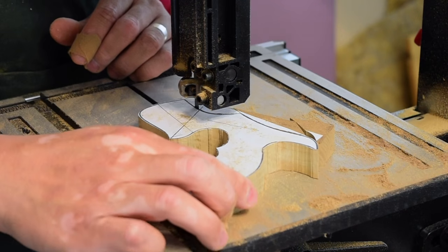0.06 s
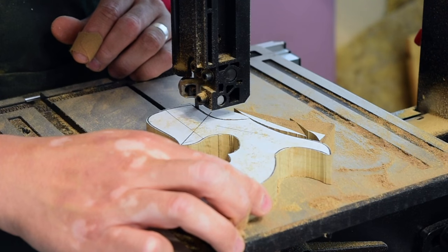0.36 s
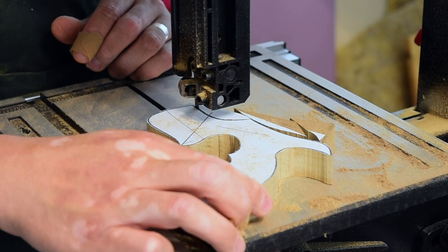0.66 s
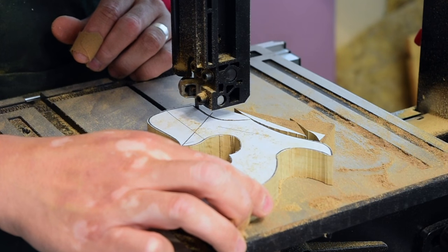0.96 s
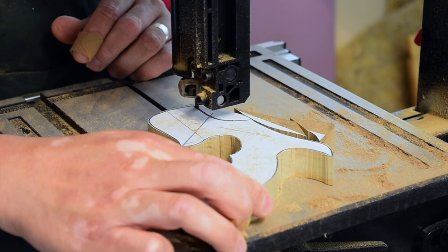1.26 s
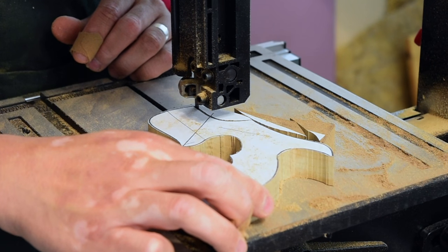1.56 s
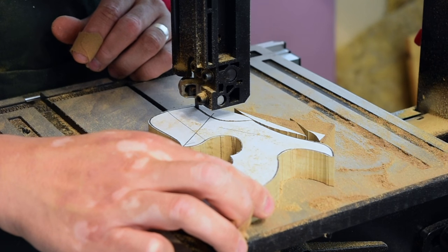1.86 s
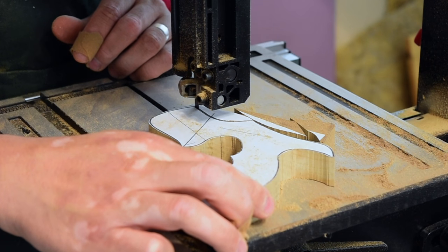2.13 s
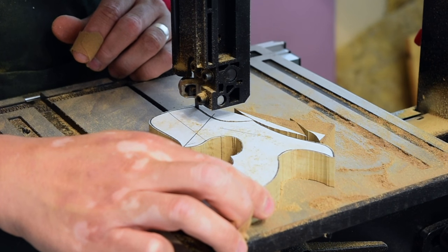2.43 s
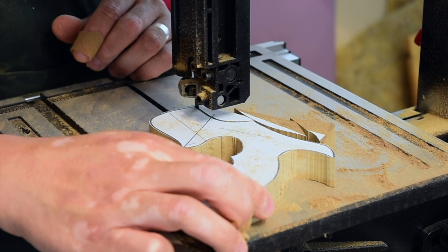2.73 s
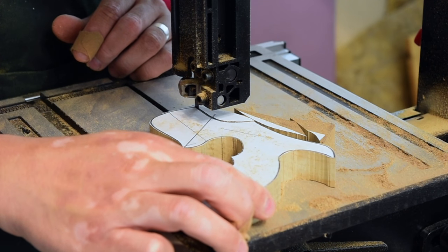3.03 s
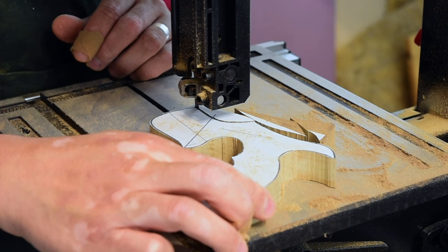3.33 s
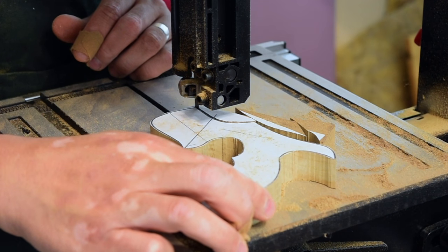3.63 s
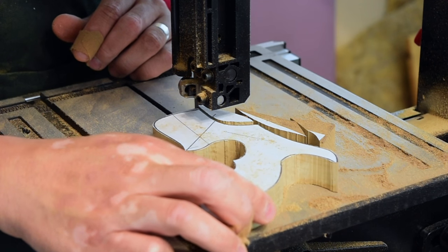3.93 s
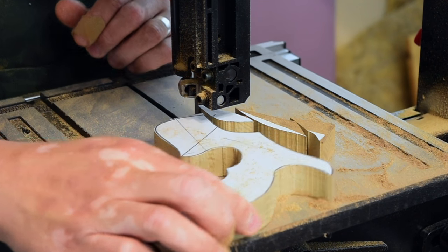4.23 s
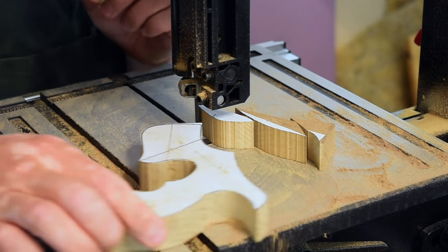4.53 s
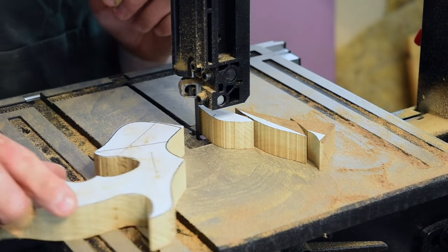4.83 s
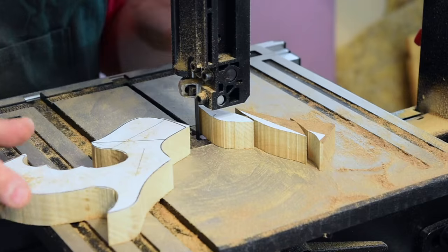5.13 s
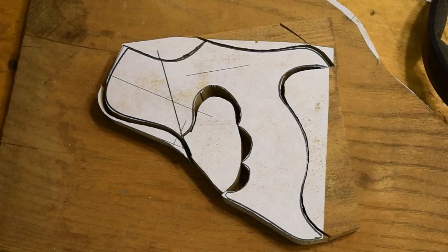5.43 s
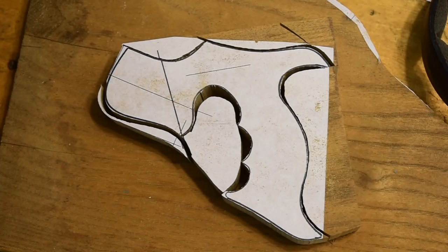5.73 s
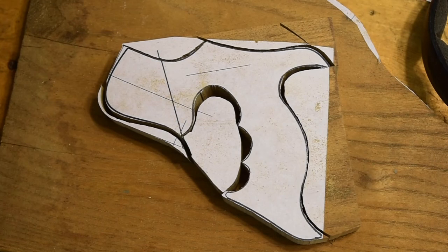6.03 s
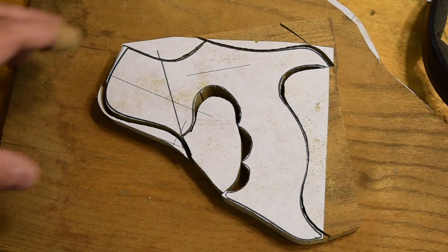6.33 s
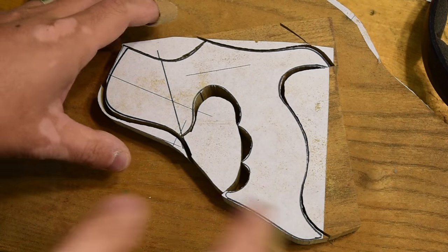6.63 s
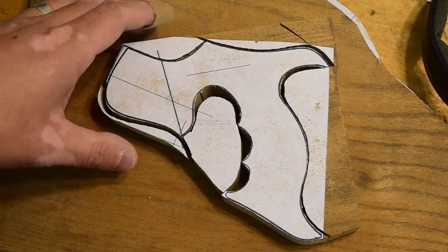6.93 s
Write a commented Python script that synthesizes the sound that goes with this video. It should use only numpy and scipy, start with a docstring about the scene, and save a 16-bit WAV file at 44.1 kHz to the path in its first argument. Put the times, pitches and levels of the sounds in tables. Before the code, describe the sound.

In a small workshop, a moment of thin hiss gives way to a band saw close to the microphone, cutting thick wood. The teeth rasp and sing, with high squeals from the blade. The blade comes free and the machine rattles and hums on. It cuts off abruptly, and a few soft bumps on a bench and a sleeve rustle follow in the quiet room.

```python
"""A small workshop, close to a benchtop band saw cutting a curve through a thick wooden block. After a moment
of thin hiss and whine the saw is there at full voice: teeth rasp and sing, the blade squeals in the kerf and
the loosening offcut rings lower and lower. The blade leaves the wood and the frame, shaken by wheels and motor,
rattles on. The scene changes abruptly to the quiet room, where soft bumps ring the bench and a sleeve rustles
over it."""
import sys
import numpy as np
from scipy import signal
from scipy.fft import rfft, irfft, next_fast_len
from scipy.io import wavfile

SR = 44100
rng = np.random.default_rng(int(sys.argv[2]) if len(sys.argv) > 2 else 0)


def put_to_file(sound):
    """Save the sound as 16-bit audio at rate SR, in the file named by the first command-line argument."""
    columns = np.atleast_2d(sound).T  # one column per channel
    safe = np.clip(columns, -1, 1)
    whole_steps = np.round(safe * 32767)
    wavfile.write(sys.argv[1], SR, whole_steps.astype(np.int16))


N = 312095
SAW_ON_S, BREAKOUT_S, SAW_OFF_S = 0.3705, 3.885, 5.455   # at breakout the blade leaves the wood
WHEEL_HZ, BLADE_LAP_HZ, TOOTH_HZ = 17.05, 8.13, 1625   # turns, laps and teeth per second


def from_db(db):
    """Decibels to gain."""
    return 10 ** (np.asarray(db) / 20)


def unit_rms(x):
    """Scale to unit power."""
    return x / np.sqrt(np.mean(x ** 2) + 1e-20)


def seconds():
    """Time of every sample."""
    return np.arange(N) / SR


def automation(points):
    """Straight ramps between (time, value) points."""
    return np.interp(seconds(), *np.transpose(points))


def after(middle_s, fade_s):
    """A smooth step from 0 to 1."""
    return .5 + .5 * np.tanh((seconds() - middle_s) / fade_s)


def fading(start_s, t60_s):
    """An envelope that starts at once and dies away."""
    age = seconds() - start_s
    return (age > 0) * from_db(-60 * np.clip(age / t60_s, 0, 4))


def stroke(peak_s, rise_s, t60_s):
    """An envelope that swells to its peak and dies away."""
    age = seconds() - peak_s
    attack = np.exp(-(np.minimum(age, 0) / rise_s) ** 2)
    return attack * from_db(-60 * np.clip(age / t60_s, 0, 4))


def white():
    """Fresh white noise."""
    return rng.standard_normal(N)


def drift(rate_hz):
    """Smooth random wandering of unit power."""
    knots = rng.standard_normal(N // 8)
    return unit_rms(np.interp(seconds() * 2 * rate_hz, np.arange(len(knots)), knots))


def tone(hz):
    """A sine of unit power that follows a pitch."""
    cycles = np.cumsum(hz * np.ones(N)) / SR
    return np.sqrt(2) * np.sin(2 * np.pi * (cycles + rng.random()))


def colour(x, eq):
    """Filter by an EQ curve of (freq_hz, gain_db) that rolls off below its first point."""
    hz, db = np.transpose(eq)
    size = next_fast_len(N + SR // 4)
    f = np.maximum(np.arange(size // 2 + 1) * SR / size, 1)
    gain = from_db(np.interp(np.log(f), np.log(hz), db)) * np.minimum(f / hz[0], 1) ** 2
    return irfft(rfft(x, size) * gain, size)[:N]


def resonate(x, hz, width_hz):
    """Two-pole resonance with gain 1 at its peak."""
    r = np.exp(-np.pi * width_hz / SR)
    feedback = [1, -2 * r * np.cos(2 * np.pi * hz / SR), r * r]
    return signal.lfilter(np.array([1, 0, -1]) * (1 - r * r) / 2, feedback, x)


def body(x, modes):
    """The direct sound plus the ringing of each resonance."""
    return x + sum(from_db(db) * resonate(x, hz, width) for hz, width, db in modes)


def ringing(x, t60_s):
    """Dense ringing: the sound dies away in a random tail."""
    age = seconds()[:SR // 3]
    tail = rng.standard_normal(len(age)) * from_db(-60 * age / t60_s)
    return signal.fftconvolve(x, tail / np.linalg.norm(tail))[:N]


# Dark room tone: freq_hz, gain_db
ROOM_EQ = [(25, -2), (70, -2), (115, 1), (170, 1), (250, 3.5), (330, -5), (450, 0), (515, 4), (620, -7),
           (1400, -9), (2300, -17), (3400, -7), (6500, -17), (11000, -17.5), (15500, -27)]

def room_tone(air_db=-58, hum_hz=113.3, hum_db=-61):
    """A bed of quiet air with a low, wavering hum."""
    air = from_db(air_db) * unit_rms(colour(white(), ROOM_EQ))
    return air + from_db(hum_db + 1.3 * drift(3.7)) * tone(hum_hz)


# Dull rub of cloth: freq_hz, gain_db
RUB_EQ = [(250, -4), (600, -1.5), (1200, 2), (2500, 0.5), (4000, -8.5), (7000, -24)]
# Airy swish on top: freq_hz, gain_db
SWISH_EQ = [(3000, -9), (5500, 3), (9500, 3), (12500, -10), (15500, -18)]
# Sleeve strokes over the bench: peak_s, rise_s, t60_s, rub_db, swish_db
STROKES = [(5.994, 0.024, .6, -53.5, -53.5), (6.13, .05, 1, -65, -57.5), (6.29, .12, 1.5, -61, -72),
           (6.45, 0.03, 1.1, -53, -67), (6.52, .05, 1.1, -61, -63.5), (7.07, .025, .5, -59, -64)]
# Ticks of cloth catching on wood: start_s, level_db, pitch_hz
TICKS = [(5.977, -44, 2500), (5.986, -40, 8000)]

def sleeve(rub_trim_db=4.0, swish_trim_db=-0.5, weave_db=1.0, tick_t60_s=0.021):
    """Cloth slides in uneven grains, stroke by stroke, and catches twice."""
    rub_power, swish_power = from_db([-67.5, -72.5]) ** 2   # it never lies quite still
    for peak_s, rise_s, t60_s, rub_db, swish_db in STROKES:
        motion = stroke(peak_s, rise_s, t60_s)
        rub_power = rub_power + (from_db(rub_db) * motion) ** 2
        swish_power = swish_power + (from_db(swish_db) * motion) ** 2
    friction = white() * from_db(weave_db * drift(200))
    rub = from_db(rub_trim_db) * np.sqrt(rub_power) * unit_rms(colour(friction, RUB_EQ))
    swish = from_db(swish_trim_db) * np.sqrt(swish_power) * unit_rms(colour(friction, SWISH_EQ))
    ticks = sum(from_db(db) * fading(start_s, tick_t60_s) * unit_rms(resonate(white(), hz, hz / 2))
                for start_s, db, hz in TICKS)
    return rub + swish + ticks


# The bench's deep sway and hollow knock: pitch_hz, t60_s
BENCH_MODES = [(36, 0.37), (138, .15)]
# Soft bumps on the bench: start_s, sway_db, knock_db
BUMPS = [(5.787, -40, -45), (5.838, -43, -48), (5.89, -58, -49), (5.94, -45, -60), (6.03, -58, -46),
         (6.098, -52, -39), (6.15, -54, -40), (6.201, -60, -48), (6.48, -43, -60), (6.576, -43, -60),
         (6.66, -50, -65), (7.055, -52, -62)]

def bumps(thud_db=-11):
    """Each bump sets both modes of the bench swinging, with a dull thud."""
    thud_eq = [(30, -9), (160, -3), (300, -16), (900, -20), (3000, -52)]
    thud = from_db(thud_db) * unit_rms(colour(white(), thud_eq))
    bench = np.zeros(N)
    for start_s, *levels_db in BUMPS:
        for (hz, t60_s), db in zip(BENCH_MODES, levels_db):
            swing = np.sin(2 * np.pi * hz * (seconds() - start_s))
            bench += from_db(db) * fading(start_s, t60_s) * (swing + thud)
    return bench


# Broad, thin hiss: freq_hz, gain_db
HISS_EQ = [(15, -25), (25, -7), (97, -3.5), (199, -7), (409, -2), (480, -5), (549, -3.5), (1100, -7.5),
           (1720, -7), (4380, -11.5), (5560, -15), (6190, -12.5), (14500, -9)]
# Narrow bands of whine: pitch_hz, width_hz, level_db
WHINE = [(5780, 26, -43), (5600, 170, -46.5), (7270, 6.1, -47), (15330, 170, -34), (15520, 200, -45)]

def opening_hiss(hiss_db=-31, flicker_db=0.5):
    """A faintly flickering hiss with a high whine in it."""
    whine = sum(from_db(db) * unit_rms(resonate(resonate(white(), hz, width), hz, 2 * width))
                for hz, width, db in WHINE)
    return from_db(hiss_db + flicker_db * drift(28)) * unit_rms(colour(white(), HISS_EQ)) + whine


def roughness(turn_hz, speed):
    """The roughness of a turning part comes round again on every turn."""
    surface = rng.standard_normal(SR)
    turns = np.cumsum(turn_hz * speed) / SR
    return surface[(turns % 1 * SR / turn_hz).astype(int)]


# Rattle of wheels, guides and covers: freq_hz, gain_db
RATTLE_EQ = [(25, -46), (70, -43), (150, -32), (200, -26.5), (260, -16.5), (330, -4.5), (440, -13.5),
             (560, -12.5), (800, -7), (1000, -14), (1300, -16), (2000, -15.5), (3000, -13.5), (6500, -17),
             (9200, -16), (12000, -23), (15500, -32)]
# Resonances of the frame: pitch_hz, width_hz, gain_db
FRAME_MODES = [(270.4, 11, 7.5), (543, 12, -7), (830, 50, -4), (1233, 110, 6.5), (1387, 25.7, 13),
               (1687, 46, 6.5), (2395, 90, 4), (4870, 69, 0.5), (5900, 130, 2.5), (7860, 85, -3),
               (8350, 60, 4.5), (9360, 97, 0), (10500, 61, -3), (11750, 70, -3.5), (12800, 120, -3)]
# Steady tones of motor, belt and wheels: pitch_hz, relative_db
MOTOR_TONES = [(51.2, -61), (68.2, -64.5), (119.4, -62.5), (153.5, -58), (187.8, -50.5), (222, -51.5),
               (239, -39.5), (274, -36.5), (278, -34), (286, -31.5), (290.3, -27), (360.5, -30.5),
               (532, -37), (597.5, -44), (630, -35.5), (894.5, -31), (925.9, -53.5), (985.1, -48.5),
               (1405, -35.5), (1715, -38), (2385, -41)]

def frame(speed, rattle_gain_db=5.5, motor_gain_db=23, chatter_db=1.0, waver=0.00139):
    """Wheels and blade rattle the frame over the motor's tones; both swell after breakout."""
    cutting_db, idling_db = -32.5, -23.5
    fader_db = cutting_db + (idling_db - cutting_db) * after(BREAKOUT_S + 0.11, fade_s=.19)
    shaking = roughness(WHEEL_HZ, speed) + roughness(BLADE_LAP_HZ, speed) + 0.5 * white()
    shaking *= from_db(chatter_db * drift(220))
    rattle = unit_rms(body(colour(shaking, RATTLE_EQ), FRAME_MODES))
    motor = sum(from_db(db) * tone(hz * (speed + waver * drift(8))) for hz, db in MOTOR_TONES)
    return from_db(fader_db) * (from_db(rattle_gain_db) * rattle + from_db(motor_gain_db) * motor)


# Fader ride of the saw table's drone: time_s, fader_db
DRONE_RIDE = [(0.39, -29.5), (0.72, -24.5), (1.55, -37), (2.35, -35.5), (2.85, -21.5), (3.5, -26.5),
              (3.8, -31.5), (4.2, -29.5), (4.45, -26), (5.44, -26.5)]

def table_drone(speed, pitch_hz=746, trim_db=-3.5, throb_depth=0.6, waver=0.00139):
    """The saw table drones on one note and throbs at the rate the wheels turn."""
    throb = 1 + throb_depth * tone(WHEEL_HZ * (speed + .04 * drift(6)))
    drone = throb * tone(pitch_hz * (speed + waver * drift(22)))
    return from_db(automation(DRONE_RIDE) + trim_db) * drone


# Squeals and scrapes in the kerf: peak_s, length_s, pitch_hz, width_hz, level_db
SQUEALS = [(0.701, .25, 5740, 48.3, -21), (1.515, 0.94, 5710, 50, -24.5), (2.55, 0.075, 4950, 1500, -20),
           (3.03, 0.12, 3275, 30, -20.5), (3.422, 0.06, 4840, 2500, -21), (3.564, 0.13, 4040, 30, -24.5),
           (3.699, .1, 4600, 150, -37), (3.77, 0.11, 3800, 119, -23.5), (3.848, .07, 3200, 197, -22),
           (3.889, .06, 13300, 160, -37), (3.9, 0.083, 8000, 5000, -24), (4.02, 0.066, 6340, 140, -29),
           (4.125, 0.078, 6300, 110, -23), (4.125, 0.07, 9500, 3000, -22.5), (4.343, .04, 5800, 400, -27)]

def squeals():
    """The blade's flank rubs the wall of the kerf: swells of friction in one resonance each."""
    friction = np.zeros(N)
    for peak_s, length_s, hz, width_hz, db in SQUEALS:
        swell = np.exp(-2 * ((seconds() - peak_s) / length_s) ** 2)
        friction += from_db(db) * swell * unit_rms(resonate(white(), hz, width_hz))
    return friction


def offcut(start_s=2.7, end_s=3.7, held_hz=3310, loose_hz=1860, end_db=-22.5, swell_db_per_s=9.5):
    """Shaken by the teeth, the offcut rings lower and louder as the bridge of wood holding it thins."""
    glide_hz = held_hz + (loose_hz - held_hz) * after(3.46, fade_s=.3)
    glide_hz *= 1 + .022 * drift(40)   # the teeth detune it at random
    level_db = end_db - swell_db_per_s * np.maximum(end_s - seconds(), 0)
    gate = after(start_s, fade_s=0.056) * (1 - after(end_s, fade_s=0.056))
    # two modes, each fluttering in level and phase
    lower, upper = [(drift(110) * tone(hz) + drift(110) * tone(hz)) / np.sqrt(2)
                    for hz in (glide_hz, 1.8 * glide_hz)]
    return gate * from_db(level_db) * (lower + from_db(-7) * upper)


# Partials of the tooth note: harmonic, relative_db
TOOTH_PARTIALS = [(1, -1.5), (2, -15), (3, -4.5)]
# Fader ride of the tooth note: time_s, fader_db
NOTE_RIDE = [(0.39, -25.5), (0.97, -21), (1.15, -25), (2.15, -27.5), (2.45, -23), (2.72, -32), (3.3, -26.5),
             (3.85, -27.5)]

def tooth_note(tooth_hz, trim_db=-0.5, lap_swell_db=3.0, rough_db=2.5, fall_db_per_s=150.5):
    """Teeth pluck the blade into a note that swells once per lap of the band and dies at breakout."""
    fader_db = automation(NOTE_RIDE) - fall_db_per_s * np.maximum(seconds() - BREAKOUT_S, 0)
    lap = np.cos(2 * np.pi * BLADE_LAP_HZ * (seconds() - .083))
    note = sum(from_db(db + rough_db * drift(45)) * tone(k * tooth_hz) for k, db in TOOTH_PARTIALS)
    return from_db(fader_db + trim_db + lap_swell_db * lap) * note


# Bright rasp of tearing fibres: freq_hz, gain_db
RASP_EQ = [(250, -22.5), (450, -11), (620, -6), (820, -4.5), (960, -11.5), (1400, -4.5), (2050, -7.5),
           (2700, -6), (3400, -3), (4400, -0.5), (5300, -2), (6000, -2.5), (6900, -8), (9300, -8),
           (12000, -16.5), (15500, -23)]
# Resonances of the blade between its guides: pitch_hz, width_hz, gain_db
BLADE_MODES = [(1677, 65, 3.5), (1732, 30, 7.5), (2383, 190, 4), (2830, 32, -2.5), (3240, 88, 5),
               (3280, 8, 5), (3700, 29, -2.5), (4060, 21, -2.5), (4760, 25, -1), (4836, 126, 6),
               (4800, 30, 4), (4980, 25, 0.5), (5710, 210, -4), (6280, 11, 2.5), (6630, 22, -10.5),
               (7340, 130, -1), (8040, 34, -2), (9260, 52, 6), (9930, 27, 3), (11760, 42, -5.5)]

def rasp(tooth_hz, level_db=-14.5, bite=0.35, ease_s=3.5, ease_db_per_s=2.5, fall_db_per_s=78):
    """Each tooth tears fibres and rings the steel; the hand eases off, then the blade breaks out."""
    ease_db = ease_db_per_s * np.maximum(seconds() - ease_s, 0)
    fall_db = fall_db_per_s * np.maximum(seconds() - BREAKOUT_S, 0)
    tearing = white() * (1 + bite * tone(tooth_hz))
    tearing += .6 * ringing(tearing, t60_s=0.19)
    grain_db = 0.37 * drift(250)   # hard and soft grain
    feed_db = 0.84 * drift(18)   # the uneven push of the hand
    tearing *= from_db(grain_db + feed_db)
    blade = unit_rms(body(colour(tearing, RASP_EQ), BLADE_MODES))
    return from_db(level_db - ease_db - fall_db) * blade


def spread(x, width_eq):
    """The direct sound is centred; reflections in the workshop give it width."""
    side = colour(ringing(x, t60_s=.5), width_eq)
    return np.array([x + side, x - side])


# Stereo width of hiss, saw and bench: freq_hz, side_minus_mid_db
HISS_WIDTH = [(30, -12), (700, -14.5), (1500, -27.5), (3000, -52), (15000, -53)]
SAW_WIDTH = [(40, -37.5), (250, -45), (500, -23.5), (850, -33), (1200, -65.5), (2400, -67.5), (3500, -36.5),
             (5500, -23.5), (7500, -35), (9700, -9.5), (12000, -4), (15500, -15)]
BENCH_WIDTH = [(40, -22), (110, -25), (380, -12), (1300, -10), (2400, -13), (4400, -4), (8000, -5),
               (15000, -2)]

def scene():
    """Hiss, then the saw, which cuts off with a faint, short tail, then the quiet bench."""
    speed = 1 + .0009 * drift(2)
    started, stopped = after(SAW_ON_S, fade_s=0.0042), after(SAW_OFF_S, fade_s=0.0055)
    hiss = spread(opening_hiss(), HISS_WIDTH)
    machine = frame(speed) + table_drone(speed)
    tooth_hz = TOOTH_HZ * (speed + 0.00694 * drift(130))   # slip jitters the tooth rate
    saw = (machine + rasp(tooth_hz) + tooth_note(tooth_hz) + offcut() + squeals()) * started
    tail = from_db(-32) * ringing(saw * (1 - stopped), t60_s=0.31)
    bench = spread(room_tone() + tail + sleeve() + bumps(), BENCH_WIDTH)
    mix = hiss * (1 - started) + spread(saw, SAW_WIDTH) * (1 - stopped) + bench * stopped
    return mix * from_db([[.1], [-.1]])   # a hair to the left


def record(dry):
    """A soft clip rounds the highest peaks and a steep low-pass cuts the top."""
    ceiling, cutoff_hz = .9, 15800
    rounded = dry / (1 + (dry / ceiling) ** 6) ** (1 / 6)
    return signal.sosfilt(signal.ellip(12, .1, 90, cutoff_hz, fs=SR, output="sos"), rounded)


dry = scene()
out = record(dry)
put_to_file(out)
```